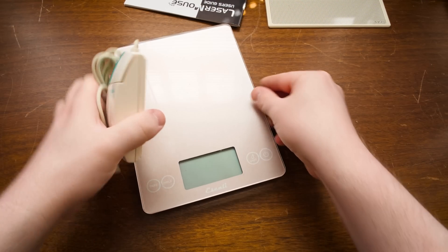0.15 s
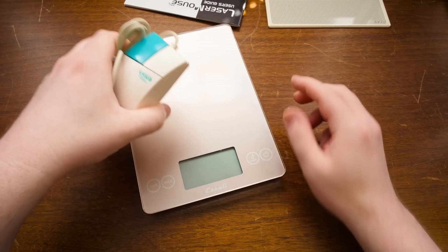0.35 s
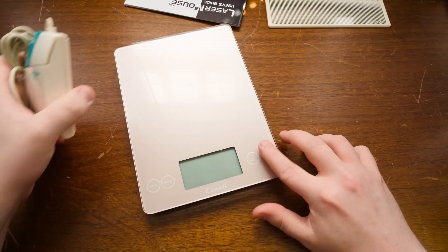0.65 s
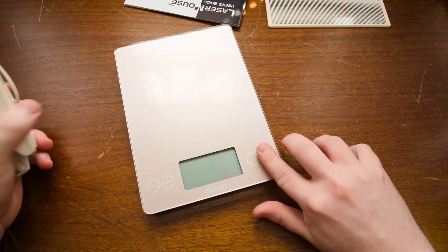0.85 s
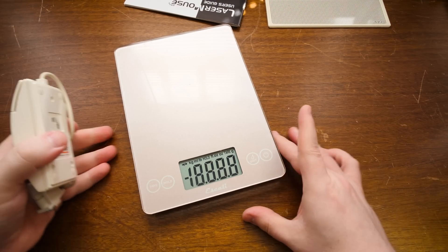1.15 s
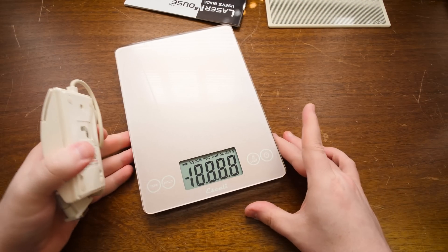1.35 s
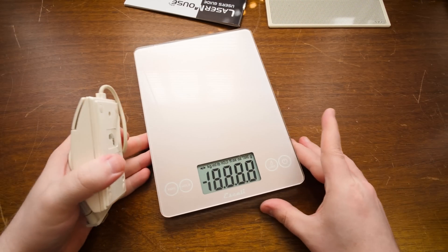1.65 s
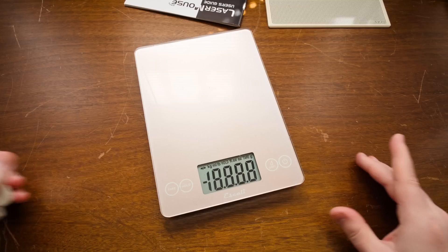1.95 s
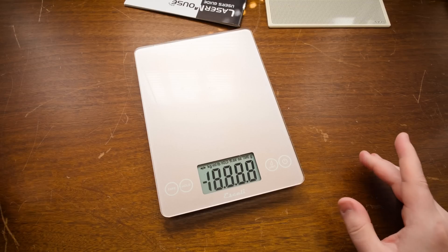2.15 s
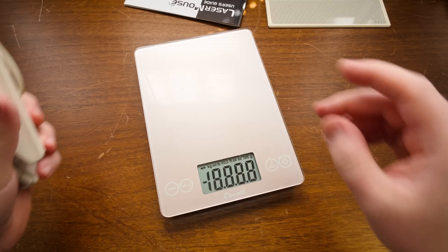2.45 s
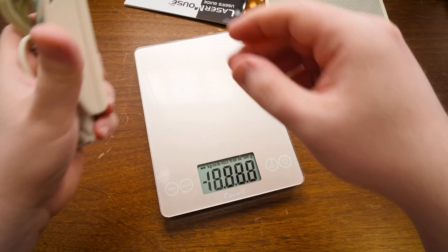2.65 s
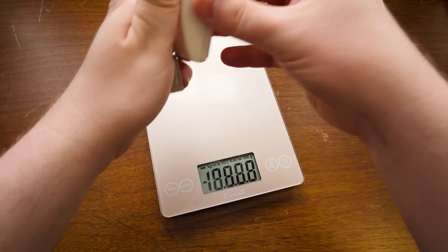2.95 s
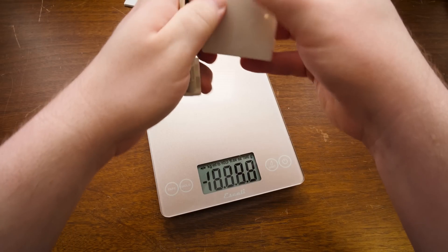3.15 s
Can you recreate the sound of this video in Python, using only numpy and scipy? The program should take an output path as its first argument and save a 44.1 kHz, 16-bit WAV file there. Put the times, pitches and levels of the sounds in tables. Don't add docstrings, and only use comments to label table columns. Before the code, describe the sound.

A glass kitchen scale clacks sharply onto a wooden table at 0.07 seconds, bouncing rapidly until 0.16 with a low table thud and short room tail. Much quieter: a hollow plastic mouse tap at 0.36, arms rubbing and juddering on wood around 1.0-1.75, a tap at 1.83 amid skin swishes, faint ticks from 2.0, then plastic rattles at 2.9 and 3.13-3.28. Close microphone, faint hum.

```python
import sys
import numpy as np
from scipy import signal
from scipy.fft import rfft, irfft
from scipy.io import wavfile
from scipy.ndimage import uniform_filter1d

SR = 44100
rng = np.random.default_rng(int(sys.argv[2]) if len(sys.argv) > 2 else 0)


def to_wav(sig):
    pcm = np.clip(np.atleast_2d(sig), -1, 1) * 32767
    pcm = np.round(pcm).astype(np.int16)
    wavfile.write(sys.argv[1], SR, pcm.T)


def rack_gain(trim_db):
    fader = np.asarray(trim_db, float)
    return 10 ** (fader / 20)


N = 145530


def unit_rms(x):
    return x / np.sqrt(np.mean(x ** 2) + 1e-20)


def read(points, hz):
    f, value = np.transpose(points)
    return np.interp(np.log(hz + 1), np.log(f + 1), value)


def add(mix, start_s, sound):
    part = mix[round(start_s * SR):][:len(sound)]
    part += sound[:len(part)]


def colour(x, shape):
    gain = rack_gain(read(shape, np.fft.rfftfreq(len(x), 1 / SR)))
    return irfft(rfft(x) * gain, len(x))


def coloured_noise(length, shape):
    return unit_rms(colour(rng.standard_normal(length), shape))


def ring(modes, seconds):
    t = np.arange(round(seconds * SR)) / SR
    out = np.zeros(len(t))
    for k, (hz, db, t60) in enumerate(modes):
        out += (-1) ** k * rack_gain(db - 60 * t / t60) * np.sin(2 * np.pi * hz * t)
    return out


def resonant_noise(hz, width_hz):
    b, a = signal.iirpeak(hz, hz / width_hz, SR)
    return unit_rms(signal.lfilter(b, a, rng.standard_normal(N)))


def lumps(seconds, db):
    size = int(seconds * SR)
    drift = uniform_filter1d(uniform_filter1d(rng.standard_normal(N), size), size)
    return rack_gain(db * unit_rms(drift))


# start_s, thud_level_db, glass_crack_level_db
BOUNCES = [
    (0.072, -20, -2),
    (0.0793, -20.5, -25),
    (0.1021, -23, -7),
    (0.108, -23, -39),
    (0.1226, -25, -15),
    (0.141, -28, -25),
    (0.161, -33, -38),
]
# pitch_hz, level_db, t60_s
BOOM_MODES = [(64, -27, 0.57), (80, -31, 0.26), (93, -24, 0.2), (134.6, -29.5, 0.28), (252, -32.5, 0.1)]
# pitch_hz, level_db, t60_s
TOP_MODES = [(387, -8.5, 0.11), (519, 0, 0.077), (658, -0.5, 0.047), (741, -5, 0.16), (930, -20, .12),
             (1001, -6.5, 0.034), (1174, -4.5, 0.16), (1235, -5, 0.14), (1389, 3, 0.042),
             (1500, -1.5, 0.069), (1638, -3, 0.069), (1730, -2.5, .12), (1973, 0.5, 0.067),
             (2342, -8, 0.13)]
# frequency_hz, density_db_per_hz
RATTLE_SPECTRUM = [(150, -3), (300, -2.5), (600, -0.5), (1400, -3.5), (2300, -8), (3200, -15.5),
                   (6000, -18.5), (12000, -34.5)]
# frequency_hz, density_db_per_hz
CRACK_SPECTRUM = [(900, -6.5), (2000, -20), (3440, -13.5), (4750, -22), (6010, -7), (7520, -18),
                  (11000, -5), (15500, -17)]


def scale_bounces():
    boom, clatter = np.zeros(N), np.zeros(N)
    t = np.arange(8192) / SR
    rattle_rise_s, rattle_t60_s = 0.004, 0.1
    crack_rise_s, crack_hold_s, crack_t60_s = 0.00098, 0.0023, 0.018
    rattle_shape = np.minimum(t / rattle_rise_s, 1) * rack_gain(-60 * t / rattle_t60_s)
    crack_decay = rack_gain(-60 * np.maximum(t - crack_hold_s, 0) / crack_t60_s)
    crack_shape = np.minimum(t / crack_rise_s, 1) * crack_decay
    for start_s, thud_db, crack_db in BOUNCES:
        add(boom, start_s, rack_gain(thud_db + 17) * ring(BOOM_MODES, 0.6))
        rattle = coloured_noise(8192, RATTLE_SPECTRUM) * rattle_shape
        add(clatter, start_s, rack_gain(thud_db - 2) * rattle)
        add(clatter, start_s, rack_gain(thud_db - 10) * ring(TOP_MODES, 0.2))
        crack = coloured_noise(8192, CRACK_SPECTRUM) * crack_shape
        add(clatter, start_s, 0.26 * rack_gain(crack_db) * crack)
    return clatter, boom


# start_s, end_s, level_db
SLIDES = [
    (0, 0.13, -53),
    (1.36, 1.717, -61),
]
# pitch_hz, width_hz, level_db
FEET_RESONANCES = [(11000, 900, -5.5), (6120, 1100, -13)]


def sliding_feet():
    t, slide = np.arange(N) / SR, np.zeros(N)
    for start_s, end_s, db in SLIDES:
        fade = np.minimum(t - start_s + 0.046, end_s - t) / 0.067
        slide += rack_gain(db) * np.clip(fade, 0, 1)
    gain = slide * lumps(0.025, 0.68)
    return gain * sum(rack_gain(db) * resonant_noise(hz, width) for hz, width, db in FEET_RESONANCES)


# frequency_hz, density_db_per_hz
RUB_SPECTRUM = [(150, -16.5), (350, -5), (650, 3), (1200, -4), (1900, -6.5), (2800, -20.5), (4500, -27),
                (9000, -27)]


def scuff_grains():
    decay = rack_gain(-60 * np.arange(1024) / SR / 0.02)
    return [coloured_noise(1024, RUB_SPECTRUM) * decay for _ in range(6)]


# start_s, level_db, length_s, pitch_hz of the answering part of the top
BUMPS = [(1.045, -52, 0.0086, 372), (1.044, -56.5, .004, 1410), (1.251, -49.5, 0.013, 368),
         (1.255, -58, 0.018, 564), (1.254, -59, 0.015, 974), (1.411, -49, 0.018, 1028),
         (1.587, -40, 0.0072, 571), (1.596, -42.5, 0.0067, 672), (1.588, -47, 0.011, 1140),
         (1.59, -51, 0.014, 1650), (1.611, -50, 0.0017, 606), (1.625, -53, 0.034, 606),
         (1.645, -46, 0.082, 1174), (1.672, -45, 0.025, 562), (1.682, -49, 0.013, 1174),
         (1.686, -43.5, .005, 610), (1.697, -50, 0.035, 1174), (1.698, -35.5, 0.015, 568),
         (1.699, -53, 0.0082, 1640), (1.70, -48, .006, 1934), (1.711, -44, 0.0064, 350),
         (1.713, -38.5, 0.0033, 560), (1.652, -51, .025, 80), (1.699, -41, 0.0095, 80),
         (1.704, -57, 0.015, 124), (1.72, -47, .02, 76.4), (1.728, -45, 0.013, 570),
         (1.755, -50.5, 0.018, 748)]


def arm_bumps(scuffs):
    out = np.zeros(N)
    for k, (start_s, db, length_s, hz) in enumerate(BUMPS):
        length = int(length_s * SR)
        stray = rng.random(length) < 0.03
        slips = 1.3 * rng.standard_normal(length) * stray
        slips[::round(SR / hz)] += 1
        body = ring([(hz, 0, 8 / hz), (1.154 * hz, -5, 8 / hz)], 0.2)
        add(body, 0, 0.12 * scuffs[k % 6])
        force = slips * np.hanning(length + 80)[60:-20]
        sound = signal.oaconvolve(force, body)
        rms = np.sqrt(np.mean(sound[:length + 200] ** 2))
        add(out, start_s, rack_gain(db - 2.5) * sound / rms)
    return out


# time_s, level_db
DRAG = [(0, -49), (.06, -44), (.3, -56), (.45, -57), (.62, -68.5), (0.999, -67.5), (1.06, -57.5),
        (1.2, -56.5), (1.27, -54), (1.39, -57), (1.43, -51), (1.56, -53), (1.701, -46), (1.79, -67),
        (2.002, -70.5), (2.3, -66), (3.3, -77)]


def arm_drag(scuffs):
    slips = rng.random((6, N)) < 300 / SR
    grit = slips * rng.standard_normal((6, N)) * lumps(0.012, 1.5)
    drag = unit_rms(signal.oaconvolve(grit, scuffs, axes=1).sum(0)[:N])
    time_s, level_db = np.transpose(DRAG)
    return rack_gain(np.interp(np.arange(N) / SR, time_s, level_db)) * drag


# start_s, level_db, pitch_hz
TAPS = [(0.364, -28, 832), (0.83, -42.5, 720), (1.83, -31, 842), (2.027, -44, 790), (2.052, -46, 845),
        (2.077, -48, 766), (2.108, -47, 805), (2.14, -48, 760), (2.156, -45.5, 790), (2.187, -45, 790),
        (2.206, -48, 770), (2.223, -47, 795), (2.258, -47.5, 820), (2.28, -46, 770), (2.49, -50, 797),
        (2.515, -51, 774), (2.556, -54.5, 814), (2.57, -47, 776), (2.586, -54, 780), (2.644, -49, 785),
        (2.68, -50, 810), (2.85, -47, 860), (2.876, -45, 800), (2.885, -44, 770), (2.899, -35, 820),
        (2.906, -30.5, 800), (2.917, -33, 796), (2.925, -33.5, 747), (2.93, -31, 814), (2.941, -43, 820),
        (3.131, -28.5, 782), (3.143, -47, 750), (3.173, -41, 800), (3.243, -43, 760), (3.258, -35, 816),
        (3.267, -41.5, 710), (3.277, -46, 770)]


def shell_taps():
    out, t60_s = np.zeros(N), 0.026
    contact = np.hanning(50) / 18
    for start_s, db, hz in TAPS:
        shell = ring([(hz, 0, t60_s), (0.844 * hz, -8, t60_s)], 0.08)
        add(out, start_s, rack_gain(db) * np.convolve(contact, shell))
    return out


# start_s, level_db, pitch_hz of the ringing wall, t60_s
TICKS = [(.3646, -38, 1500, 0.03), (0.367, -44, 2350, 0.065), (.385, -54, 2350, 0.14),
         (.41, -53, 855, 0.16), (0.8162, -47, 4730, 0.02), (0.817, -42.5, 1800, 0.02),
         (1.413, -49, 3970, 0.044), (1.7, -34.5, 12100, 0.018), (1.703, -49, 3320, 0.016),
         (1.831, -44, 2370, 0.042), (2.195, -46, 11500, 0.022), (2.644, -48, 5520, 0.013),
         (2.849, -41.5, 2100, 0.012), (2.849, -50, 5000, 0.011), (2.89, -43, 3000, 0.016),
         (2.8988, -31, 6940, 0.013), (2.8998, -33.5, 3630, 0.019), (2.9, -34, 1500, 0.023),
         (2.9042, -34.5, 10200, 0.023), (2.905, -34.5, 5600, 0.031), (2.906, -44, 1900, 0.038),
         (2.911, -36, 3530, 0.033), (2.911, -32.5, 11500, .02), (2.917, -33, 1940, 0.025),
         (2.918, -40.5, 8900, 0.044), (2.926, -42, 5630, 0.034), (2.929, -39, 2280, 0.062),
         (2.956, -54, 2000, 0.021), (3.1089, -41, 1990, 0.037), (3.1314, -36, 5300, 0.014),
         (3.1304, -40.5, 2480, 0.039), (3.1426, -35.5, 5500, 0.028), (3.1432, -37.5, 9000, 0.018),
         (3.144, -43.5, 2250, 0.068), (3.1765, -43.5, 1970, 0.04), (3.241, -53, 6500, .01),
         (3.241, -51, 1730, 0.014), (3.257, -41.5, 3410, 0.027), (3.258, -52, 6000, .02),
         (3.2585, -38, 11500, 0.0066), (3.267, -44, 2040, 0.043), (3.258, -47, 2080, 0.037)]


def wall_ticks():
    out, t = np.zeros(N), np.arange(1500) / SR
    f = np.fft.rfftfreq(1500, 1 / SR) + 1
    half_width_octaves, wall_db, rise_s = 1.4, 2.5, 0.0015
    for start_s, db, hz, t60_s in TICKS:
        wide = 1 / (1 + (np.log2(f / hz) / half_width_octaves) ** 6)
        wall = 3 * rack_gain(wall_db) / (1 + ((f - hz) / (0.078 * hz)) ** 2)
        snap = unit_rms(irfft(rfft(rng.standard_normal(1500)) * (wide + wall)))
        shape = rack_gain(db - 60 * t / t60_s) * np.minimum(t / rise_s, 1)
        add(out, start_s, 0.5 * shape * snap)
    return out


# start_s, rise_s, fall_s, level_db
SWISHES = [(0.469, 0.041, 0.13, -54.5), (.82, 0.11, 0.14, -58.5), (.99, 0.037, 0.13, -58),
           (1.08, 0.12, 0.082, -55.5), (1.33, 0.073, 0.047, -60), (1.55, 0.47, 0.071, -53),
           (1.768, 0.069, 0.29, -49.5), (1.85, 0.14, 0.14, -46.5), (2.16, 0.041, 0.12, -76),
           (2.261, 0.038, 0.052, -57), (2.8, 0.098, 0.17, -61.5), (3.13, 0.027, 0.079, -58.5)]
# frequency_hz, density_db_per_hz
SKIN_SPECTRUM = [(700, -16.5), (1300, -13.5), (4000, -24.5), (6000, -18), (9000, -16), (11000, -7),
                 (13000, -9), (15800, -15)]


def skin_swishes():
    power = np.zeros(N)
    for start_s, rise_s, fall_s, db in SWISHES:
        up = np.linspace(0, 0.5, int(rise_s * SR))
        down = np.linspace(0.5, 1, int(fall_s * SR))
        add(power, start_s, rack_gain(2 * db) * np.sin(np.pi * np.r_[up, down]) ** 2)
    return np.sqrt(power) * lumps(0.0033, 0.73) * coloured_noise(N, SKIN_SPECTRUM)


# frequency_hz, density_db_per_hz
AIR_SPECTRUM = [(22, -20), (45, 2), (130, -4), (400, -7.5), (1300, -16.5), (3500, -26), (8000, -28),
                (12000, -23), (15700, -28.5)]
# pitch_hz, width_hz, level_db
HUMS = [(44.7, 17, -57), (116.3, 2.1, -65.5), (780, 140, -68)]


def background():
    air = rack_gain(-58.5) * coloured_noise(N, AIR_SPECTRUM) * lumps(0.054, 0.35)
    return air + sum(rack_gain(db) * resonant_noise(hz, width) for hz, width, db in HUMS)


# frequency_hz, t60_s
ROOM_T60 = [(100, 0.63), (500, 0.27), (1500, 0.36), (4000, 0.28), (10000, 0.23)]
# delay_s, level_db
ECHOES = [
    (.0025, -32),
    (.008, -8),
]


def room(x):
    out = x.copy()
    for delay_s, db in ECHOES:
        add(out, delay_s, rack_gain(db) * x)
    turn = 2 * np.pi * 12 * np.arange(N) / SR
    tail_db, rise_s = -6, 0.018
    for k in range(3):
        hz, t, z = signal.stft(rng.standard_normal(SR // 2), SR, nperseg=256)
        decay = rack_gain(-60 * t / read(ROOM_T60, hz)[:, None])
        tail = signal.istft(z * decay, SR, nperseg=256)[1]
        rise = np.minimum(np.arange(len(tail)) / (rise_s * SR), 1)
        tail = rack_gain(tail_db) * tail * rise / np.linalg.norm(tail)
        share = np.cos(turn + k * np.pi / 3) * np.sqrt(2 / 3)
        out += signal.oaconvolve(x * share, tail)[:N]
    return out


def scene():
    clatter, boom = scale_bounces()
    fizz = sliding_feet()
    scuffs = scuff_grains()
    arms = arm_drag(scuffs) + arm_bumps(scuffs)
    mouse = shell_taps() + wall_ticks()
    airborne = 0.61
    in_room = room(clatter + fizz + airborne * arms + mouse)
    in_table = (1 - airborne) * arms + boom
    return (in_room + in_table + skin_swishes() + background())[None]


def band_limit(x):
    return signal.sosfilt(signal.butter(12, 17090, fs=SR, output="sos"), x)


def record(dry):
    low_cut = signal.sosfilt(signal.butter(2, 24, "high", fs=SR, output="sos"), dry)
    mix = signal.oaconvolve(low_cut, signal.firwin(1023, 15760, fs=SR)[None], "same")
    return band_limit(mix)


dry = scene()
out = record(dry)
to_wav(out)
```